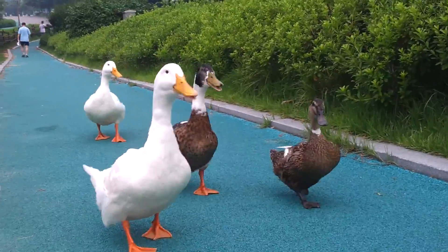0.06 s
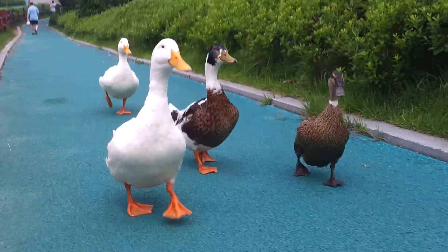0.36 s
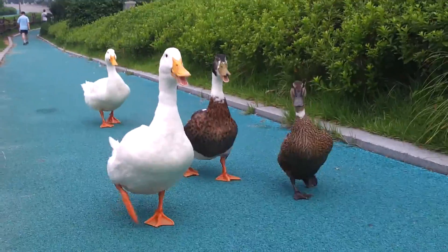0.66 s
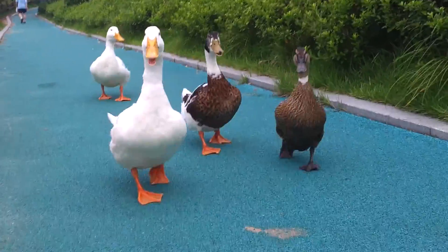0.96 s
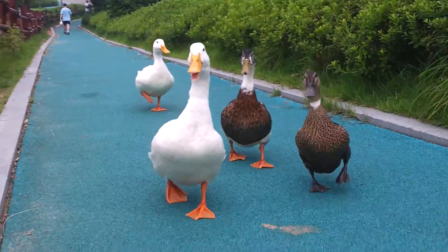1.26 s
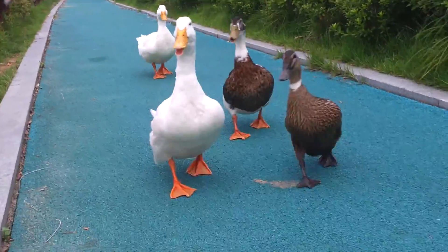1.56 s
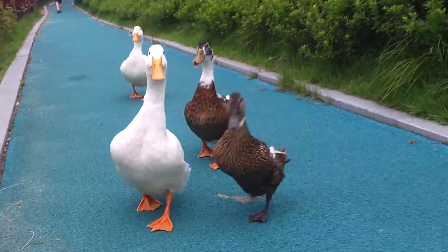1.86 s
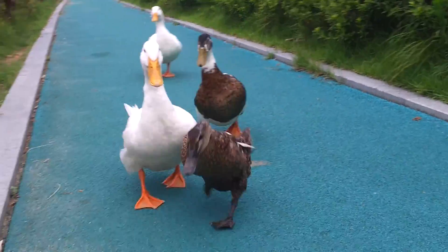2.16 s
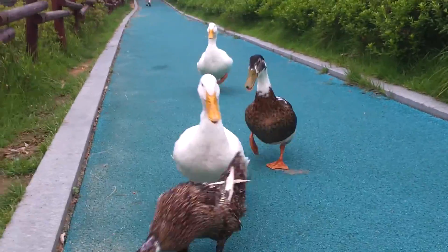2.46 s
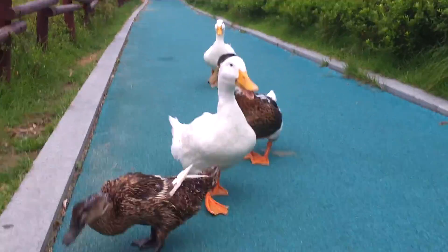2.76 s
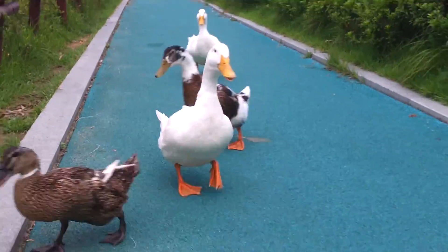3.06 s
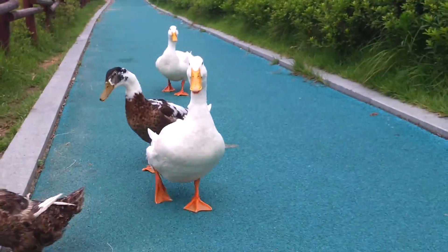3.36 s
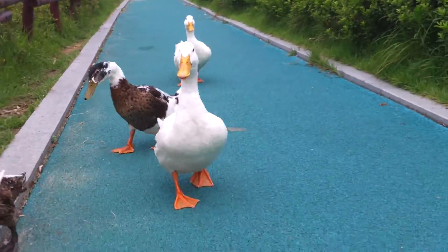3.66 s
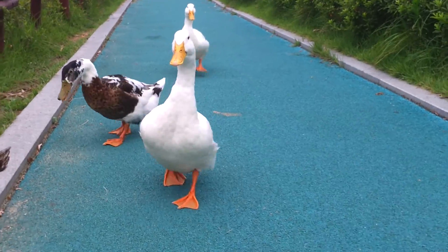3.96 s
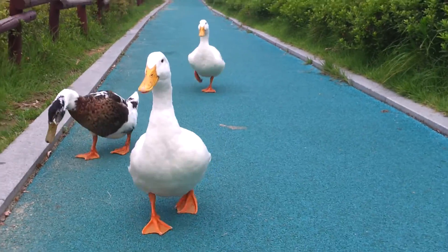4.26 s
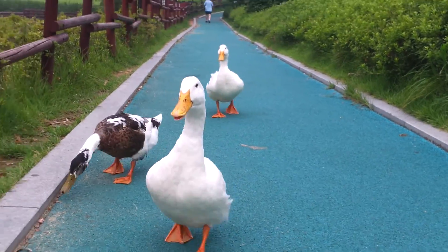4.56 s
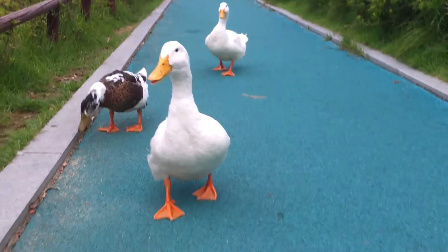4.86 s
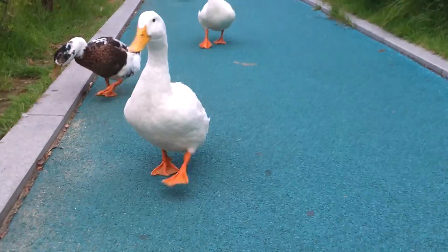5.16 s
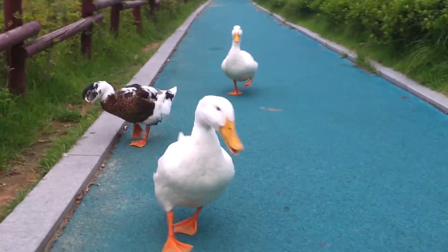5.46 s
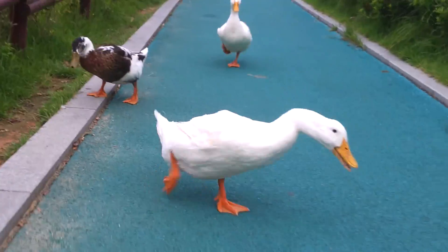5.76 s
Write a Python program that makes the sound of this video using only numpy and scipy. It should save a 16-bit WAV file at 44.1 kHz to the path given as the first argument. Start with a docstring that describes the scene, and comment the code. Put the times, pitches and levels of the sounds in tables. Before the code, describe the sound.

Short, low, raspy duck quacks follow one another outdoors over high cicada buzzing, with light ticks and scuffs of feet on grit.

```python
"""Domestic ducks waddle up a park path toward a hand-held microphone, quacking short, low and rasping.
Most calls open with a cluck of the bill, then the flapping syrinx rings the throat. Close by, feet
scuff and tick on the grit. In the bushes cicadas buzz and trill with their buckling tymbals; far off
are the town and a humming machine. Late on, the hand jostles and bumps the microphone."""
import sys
import numpy as np
from scipy import signal
from scipy.fft import rfft, irfft, next_fast_len
from scipy.io import wavfile
from scipy.ndimage import uniform_filter1d

SR = 44100
rng = np.random.default_rng(int(sys.argv[2]) if len(sys.argv) > 2 else 0)


def output_pcm(signal):
    """Save a mono or channel-first signal as 16-bit PCM at the path in sys.argv[1].

    Samples are clipped to [-1, 1] before scaling.
    """
    pcm = np.clip(np.atleast_2d(signal).T, -1, 1) * 32767
    wavfile.write(sys.argv[1], SR, np.round(pcm).astype(np.int16))


N = 260631
TIME = np.arange(N) / SR

# spectrum of the open air: frequency_hz, gain_db
AIR_SPECTRUM = [(20, -50), (35, -26), (55, 4.5), (110, 2), (200, -1), (350, -6), (650, -12), (1200, -11),
                (2900, -17.5), (4200, -15), (5200, -16), (6000, -14.5), (6500, -10.5), (7500, -16.5),
                (10500, -13), (12000, -45), (14500, -45)]
# level of the open air: time_s, level_db
AIR_LEVELS = [(0, -43.5), (1.1, -44.5), (1.7, -44.5), (2.6, -45), (3.2, -45), (4.5, -45), (5.9, -43.5)]
# partials of the far machine: pitch_hz, relative_db
HUM_PARTIALS = [(70, -52.5), (140, -55)]
# cicada buzz in the bushes: time_s, level_db, body_resonance_hz, direct_chirp_gain
BUZZ_CURVES = [(0.0, -35.5, 9300, 0.54), (0.6, -35.5, 9300, 0.8), (0.89, -35, 9330, .7),
               (1.03, -30, 9330, 0.8), (1.12, -33.5, 9400, 1), (1.36, -31, 9370, 0.8),
               (1.54, -34, 9230, 0.77), (1.81, -31, 9300, 0.19), (2.5, -33.5, 9370, 0.22),
               (3.22, -37, 9410, .22), (3.65, -36.5, 9370, 0.1), (4.75, -40, 9380, 0.43),
               (4.91, -44, 9320, 0.4), (5.9, -41.5, 9470, 0.16)]
# spectrum of the blurred cicada chorus: frequency_hz, gain_db
CHORUS_SPECTRUM = [(7000, -60), (7700, -43), (8400, -4), (9000, 7), (9400, -8), (9900, 1.5), (10500, -42),
                   (11400, -14.5), (12500, -59)]
# duck calls: start_s, rise_s, fade_s, relative_db, flaps_per_s, pitch_hz, climb_octaves_per_s,
# bill_gape (0-1), cluck_strength (0-1)
DUCK_CALLS = [(0.011, 0.016, 0.018, -34.5, 54, 1393, 6, 0.6, 0.25),
              (0.075, 0.083, 0.046, -27.5, 59, 1515, 0.6, 0.28, 0.6),
              (0.391, 0.059, 0.039, -29, 65, 1506, 0, 0.36, 0.56),
              (0.614, 0.04, 0.031, -26.5, 69, 1698, -2.0, 0.7, 0.71),
              (0.95, 0.051, 0.06, -30.5, 60, 1467, 5, 0.25, 0.65),
              (1.237, 0.047, 0.061, -29, 57, 1660.0, 2, 0.7, 0.42),
              (1.437, 0.026, 0.042, -26.5, 74, 1616, 1.5, 0.4, 0),
              (1.522, 0.028, 0.046, -35, 62, 1362, 7.8, 0.5, 0.35),
              (1.714, 0.025, 0.074, -27.5, 71, 1530.0, -1.4, 0.24, 0.52),
              (1.916, 0.049, 0.018, -28, 73, 1482, -3, 0.9, 0),
              (1.976, 0.038, 0.024, -25.5, 66, 1616, -9.5, 0.6, 0.73),
              (2.191, 0.038, 0.042, -26, 72, 1566, 1.4, 0.62, 0.42),
              (2.386, 0.031, 0.039, -29, 67, 1597, -2.3, 0.74, 0.02),
              (2.48, 0.027, 0.046, -28.5, 66, 1470.0, 4.9, 0.84, 0.58),
              (2.718, 0.043, 0.025, -25.5, 61, 1492, 0.5, 0.74, 0.52),
              (2.893, 0.031, 0.027, -25.5, 64, 1480.0, 6.5, 0.62, 0),
              (2.952, 0.039, 0.036, -26.5, 69, 1580, -1, 0.75, 0.25),
              (3.222, 0.044, 0.047, -28.5, 65, 1566, 4, 0.5, 0.25),
              (3.415, 0.024, 0.033, -27, 64, 1676, -6.5, 0.46, 0.07),
              (3.528, 0.04, 0.017, -28.5, 68, 1510, -9.0, 0.55, 0.4),
              (3.735, 0.025, 0.052, -26, 68, 1524, 1.5, 0.4, 0.48),
              (3.919, 0.025, 0.027, -29, 70, 1872, 1, 0.52, 0.05),
              (4.117, 0.041, 0.018, -27.5, 66, 1652, 6, 0, 0.48),
              (4.274, 0.026, 0.032, -38.5, 58, 1617, -6.5, 0.8, 0.2),
              (4.429, 0.029, 0.034, -26.5, 74, 1536, -9.5, 0.4, 0.54),
              (4.744, 0.026, 0.036, -29, 69, 1636, -9.0, 0.3, 0.55),
              (5.013, 0.028, 0.04, -27, 62, 1690, -7, 0.4, 0.58),
              (5.213, 0.028, 0.042, -25, 74, 1700, -1.5, 0.43, 0.46),
              (5.453, 0.023, 0.034, -24.5, 78, 1807, -8, 0.5, 0.62),
              (5.72, 0.025, 0.027, -26.5, 66, 1640, 0, 0.65, 0.37)]
# puff of the opening bill: frequency_hz, gain_db
CLUCK_SPECTRUM = [(150, 1.5), (600, -2.5), (900, 15), (1200, 5), (1550, 3), (2100, -1), (2700, 1.5),
                  (3500, 5.5), (4200, 2), (5000, 2.5), (6200, 1.5), (8000, -6.5), (12000, -60)]
# throat resonances: centre_hz, width_hz, bill_shut_db, bill_open_db
THROAT_MODES = [(890, 150, -6, 7), (1237, 74, 7.5, 11), (1534, 89, -5, 3.5), (1888, 78, 6, 3.5),
                (2410, 190, -9, 14.5)]
# upper resonances of windpipe and bill: centre_hz, width_hz, bill_shut_db, bill_open_db
WINDPIPE_MODES = [(3024, 260, -4, -1.5), (3650, 74, -3.5, 6.5), (4250, 330, 1, -7), (4770, 59, 5.5, 10),
                  (5190, 155, 6.5, 0.5), (6200, 730, -2.5, -8.5)]
# bouts from a second kind of cicada: start_s, length_s, pitch_hz, level_db, change_db_per_s
TRILL_BOUTS = [(0.027, .06, 5230, -27.5, 0), (0.109, .41, 5310, -38, -18), (0.564, .29, 3860, -48, -5),
               (0.867, .6, 5056, -37.5, -3), (1.045, .18, 4430, -51, 0), (1.577, .6, 5056, -47.5, -5),
               (3.363, .5, 5100, -47, -8)]
# feet dragging on the path: middle_s, length_s, level_db
FOOT_SCUFFS = [(0.265, 0.15, -43.5), (1.271, 0.084, -36), (1.564, 0.086, -38.5), (1.972, 0.063, -41),
               (2.178, 0.14, -41.5), (2.856, 0.15, -41.5), (3.577, 0.076, -39), (4.026, 0.1, -46),
               (5.589, 0.15, -40), (5.834, 0.14, -35.5)]
# grit under a sole: frequency_hz, gain_db
SCUFF_SPECTRUM = [(100, -14.5), (250, 5), (600, 0), (1000, 4.5), (1500, 0), (3000, 0), (5000, 0),
                  (8000, -3), (11000, -12), (14500, -49)]
# claws and grit striking the path: start_s, peak_db, tilt_db_per_octave, crunch_decay_s
GRIT_TICKS = [(0.319, -17.5, 3.5, 0.0008), (0.9761, -22.5, -9.5, 0.0018), (1.277, -16, -4, 0.0014),
              (1.8526, -17, 2.5, 0.0037), (2.1896, -22, -2, 0.0014), (2.845, -22, 2, .003),
              (2.8745, -20, -1, .001), (2.878, -19.5, 2, .002), (4.0261, -21.5, -3.5, 0.0026),
              (4.033, -23.5, -1, .002), (4.246, -9.5, 6, 0.0014), (4.9867, -15, 1.5, 0.00057),
              (5.5589, -12.5, 1, 0.0012), (5.5722, -22, -2, 0.00083), (5.5886, -19, -5, 0.00087),
              (5.5975, -15, -3, 0.0027), (5.6166, -12, -2, 0.003), (5.634, -19, -3, 0.0011),
              (5.849, -14, -2, 0.0017)]
# spectrum of one tick: frequency_hz, gain_db
TICK_SPECTRUM = [(150, -1), (800, 6.5), (1500, 6.5), (2800, 10), (4700, 9.5), (7000, 4.5), (9500, -0.5),
                 (11500, -10), (14500, -18.5)]
# dull bumps on the microphone: middle_s, length_s, pitch_hz, level_db
MIC_BUMPS = [(4.623, .12, 60, -43), (4.836, 0.041, 59, -37), (5.683, 0.0366, 104, -32)]


def gain_of(db):
    """Decibels to a factor."""
    return 10 ** (np.asarray(db) / 20)


def unit_rms(x):
    """Scales to an rms of 1."""
    return x / np.sqrt(np.mean(x ** 2) + 1e-20)


def add(mix, start_s, sound):
    """Mixes a sound in at a time."""
    at = round(start_s * SR)
    sound = sound[max(-at, 0):]
    part = mix[max(at, 0):][:len(sound)]
    part += sound[:len(part)]


def colour(x, spectrum, tilt_db=0):
    """Causal filter with the given spectrum, tilted by tilt_db an octave about the mid treble."""
    size = next_fast_len(len(x) + 2048)
    octave = np.log2(abs(np.fft.fftfreq(size, 1 / SR)) + 1)
    hz, db = np.transpose(spectrum)
    curve_db = np.interp(octave, np.log2(hz), db) + tilt_db * np.clip(octave - 12, -1.5, 1)
    minimum_phase = np.exp(np.conj(signal.hilbert(np.log(gain_of(curve_db)))))
    return np.fft.ifft(np.fft.fft(x, size) * minimum_phase).real[:len(x)]


def band(x, low_hz, high_hz):
    """Band-pass filter."""
    return signal.sosfilt(signal.butter(3, [low_hz, high_hz], 'bandpass', fs=SR, output='sos'), x)


def drift(per_s):
    """Smooth random wandering of rms 1 over the whole scene."""
    hz = np.fft.rfftfreq(N, 1 / SR)
    return unit_rms(irfft(rfft(rng.standard_normal(N)) * np.exp(-(hz / per_s) ** 2), N))


def resonate(x, hz, width_hz):
    """A resonance of gain 1, steady or following a curve."""
    carrier = np.exp(2j * np.pi * np.cumsum(hz * np.ones(len(x))) / SR)
    pole = np.exp(-np.pi * width_hz / SR)
    return 2 * (carrier * signal.lfilter([1 - pole], [1, -pole], x / carrier)).real


def hedge_scatter(x, t60_s=0.056, wet_db=-17):
    """Hedge and fence scatter a short tail back to the microphone."""
    t = np.arange(SR // 2) / SR
    echoes = rng.standard_normal(len(t)) * (rng.random(len(t)) < .05)
    echoes *= (t > .006) * gain_of(-60 * t / t60_s)
    return x + gain_of(wet_db) * signal.fftconvolve(x, echoes / np.linalg.norm(echoes))[:N]


def open_air(swell_db=1.0):
    """Distant town and insects merge into a nearly steady wash."""
    level_db = np.interp(TIME, *np.transpose(AIR_LEVELS)) + swell_db * drift(1.8)
    return gain_of(level_db) * unit_rms(colour(rng.standard_normal(N), AIR_SPECTRUM))


def machine_hum(trim_db=-1):
    """A machine far off, wavering in pitch and level."""
    wavering_s = np.cumsum(1 + .008 * drift(5)) / SR
    return sum(np.sqrt(2) * gain_of(db + trim_db + 2 * drift(5)) * np.sin(2 * np.pi * hz * wavering_s)
               for hz, db in HUM_PARTIALS)


def tymbal(buckles_per_s, top_hz, fall_hz):
    """Each buckling of a cicada's tymbal rings a short note that falls in pitch."""
    phase = np.cumsum(buckles_per_s * (1 + .039 * drift(60))) / SR % 1
    hz = top_hz - fall_hz * phase + 110 * drift(202)
    attack = 1 - np.exp(-(phase / .05) ** 2)
    decay = np.exp(-phase / .98) * (1 - phase ** 6)
    return unit_rms(attack * decay * np.sin(2 * np.pi * np.cumsum(hz) / SR) * gain_of(.26 * drift(59)))


def cicada_buzz(body_width_hz=230):
    """Two near cicadas ring their hollow bodies; as the path leads away they sink into the chorus."""
    times, *columns = np.transpose(BUZZ_CURVES)
    level_db, body_hz, direct = (np.interp(TIME, times, column) for column in columns)
    pair = tymbal(127, 10250, 2700) + gain_of(-7) * tymbal(121.5, 10200, 2400)
    pair = hedge_scatter(resonate(pair, body_hz, body_width_hz) + direct * pair, t60_s=.04, wet_db=-8)
    pair /= np.sqrt(uniform_filter1d(pair ** 2, size=6000))  # the level curve alone sets the loudness
    chorus = unit_rms(colour(rng.standard_normal(N), CHORUS_SPECTRUM))
    chorus_gain = gain_of(np.interp(TIME, [3, 5], [-13, -5]))
    return gain_of(level_db) * (pair + chorus_gain * chorus) / np.hypot(1, chorus_gain)


def bill_clucks(full_db=-17.5, knock_hz=900, knock_db=-16):
    """The bill parts at the start of a call: a soft puff and a small knock."""
    out, t = np.zeros(N), np.arange(2200) / SR
    onset = np.minimum(t / .0008, 1)
    decay = np.exp(-t / .004) + gain_of(-13) * np.exp(-t / .02)
    for start, *_, strength in DUCK_CALLS:
        puff = colour(rng.standard_normal(len(t)) * onset * decay, CLUCK_SPECTRUM)
        knock = np.sin(2 * np.pi * knock_hz * rng.uniform(.9, 1.05) * t) * onset * np.exp(-t / .005)
        add(out, start, strength * gain_of(full_db) * (puff / abs(puff).max() + gain_of(knock_db) * knock))
    return out


def vocal_tract(x, modes, gape, tuning):
    """Parallel resonances of alternating sign, weighted by the bill's gape and tuned by the neck."""
    return sum((-1) ** k * gain_of(shut_db + gape * (open_db - shut_db)) * resonate(x, hz * tuning, width)
               for k, (hz, width, shut_db, open_db) in enumerate(modes))


def quack(swell_s, fade_s, flaps_per_s, pitch_hz, climb, gape, flutter_hz=330, rasp_db=-9):
    """Each flap of the syrinx lets a nasal squawk up the throat. Returns (time to peak effort, call)."""
    breath, leak, open_cycles = .16, .2, .15
    t = np.arange(-1.8 * swell_s, 1.6 * fade_s, 1 / SR)
    effort = np.exp(-abs(t / np.where(t < 0, swell_s, fade_s)) ** 2.7)
    reach_octaves = .33 if climb > 0 else .16
    contour_hz = pitch_hz * 2 ** (reach_octaves * np.tanh(climb * t / reach_octaves))
    # the throat follows the pitch and arches with the effort
    tuning = (contour_hz / 1550) ** .18 * (1 + .03 * (effort - .8)) * rng.normal(1, .008)
    jitter = .036 * np.sin(2 * np.pi * (t * flaps_per_s / np.pi + rng.random()))
    cycles = t * flaps_per_s + jitter
    flap = np.round(cycles).astype(int)
    phase = cycles - flap
    spreads = np.array([[.06], [.8], [.13], [.2]])  # no two flaps are alike
    detune, slide, force, flutter_speed = 1 + spreads * rng.standard_normal((4, 32))[:, flap]
    opening = force * np.exp(-.5 * (phase / (open_cycles * np.where(phase < 0, .65, 1.25))) ** 2)
    angle = 2 * np.pi * np.cumsum(contour_hz * detune * 2 ** (.55 * slide * phase)) / SR
    # a faster flutter of the membrane spreads each squawk over the neighbouring resonances
    flutter = 1 + .4 * np.cos(2 * np.pi * (np.cumsum(flutter_hz * flutter_speed) / SR + rng.random()))
    squawk = (np.sin(angle) + .17 * opening * np.sin(2 * angle)) * flutter
    air, hiss = rng.standard_normal((2, len(t)))
    flow = (opening + leak) * ((1 - breath) * squawk + 4 * breath * air)
    voice = band(vocal_tract(flow, THROAT_MODES, gape, tuning), 630, 3500)
    # effort alone sets how loud a flap is, whichever resonance it meets
    period = round(SR / flaps_per_s)
    power = uniform_filter1d(uniform_filter1d(voice ** 2, period), period)
    voice = effort * voice / np.sqrt(power + 1e-12)
    # the upper resonances are struck as the opening snaps shut
    closing = force * np.exp(-.5 * ((phase - .1) / open_cycles) ** 2)
    snaps = hiss * effort ** 1.43 * (closing + leak)
    rasp = band(vocal_tract(snaps, WINDPIPE_MODES, gape, tuning), 1900, 6640)
    call = unit_rms(voice) + gain_of(rasp_db) * unit_rms(rasp)
    return -t[0], call * np.sqrt(np.mean((effort * opening) ** 2))


def ducks(trim_db=0.5, catch_s=.009, lead_s=0.001494):
    """Voices catch just after the bills open; the strongest flap leads the throat's loudest ring."""
    out = np.zeros(N)
    for start, rise, fade, db, flaps_per_s, hz, climb, gape, _ in DUCK_CALLS:
        to_peak_s, call = quack(max(rise - catch_s, catch_s), fade, flaps_per_s, hz, climb, gape)
        add(out, start + rise - lead_s - to_peak_s, gain_of(db + trim_db) * call)
    return out


def far_cicada(level_db=-53, throb_hz=9, throb_db=3.5):
    """A far singer comes and goes, reaching the microphone mostly as scattered sound."""
    song = unit_rms(hedge_scatter(tymbal(84, 5500, 800), t60_s=.1, wet_db=4))
    swell_db = throb_db * np.sin(2 * np.pi * throb_hz * TIME + drift(1.7)) + 2 * drift(2.2)
    return gain_of(level_db) * unit_rms(song * gain_of(swell_db))


def trill(hz, length_s=.054, chirps_per_s=83, spread_db=2.5, blur=.4):
    """A run of four or five uneven falling chirps, blurred by the leaves."""
    t = np.arange(int(length_s * SR)) / SR
    cycles = t * chirps_per_s * rng.uniform(.92, 1.08)
    phase = cycles % 1
    detune, steepness, strength = rng.standard_normal((3, 16))[:, cycles.astype(int)]
    sweep = .22 * (hz / 5000) ** 2 * (1 + steepness / 4)
    pitch_hz = hz * (1 + .018 * detune) * (1 - sweep * (phase - .5))
    pulses = gain_of(spread_db * strength) * np.sin(np.pi * phase) ** 2
    chirps = pulses * np.sin(2 * np.pi * np.cumsum(pitch_hz) / SR)
    scatter = resonate(resonate(rng.standard_normal(len(t)), hz, 900), hz, 900)
    return (unit_rms(chirps) + blur * unit_rms(scatter)) * signal.windows.tukey(len(t), .25)


def cicada_trills(every_s=.11, slowing_per_s=.08, first_trill_db=-5):
    """Bouts of trills from the bushes; each opens softly and slows as it goes on."""
    out = np.zeros(N)
    for start, length, hz, db, db_per_s in TRILL_BOUTS:
        for elapsed in np.arange(0, length, every_s):
            level_db = db + db_per_s * elapsed + first_trill_db * (elapsed == 0)
            add(out, start + elapsed * (1 + slowing_per_s * elapsed), gain_of(level_db) * trill(hz))
    return out


def foot_scuffs(grains_per_s=3500):
    """Soles drag over grit close by: many small grains under each stroke."""
    strokes = np.zeros(N)
    for middle, length, db in FOOT_SCUFFS:
        add(strokes, middle - length / 2, gain_of(db) * signal.windows.tukey(int(length * SR), .6))
    grains = (rng.random(N) < grains_per_s / SR) * rng.standard_normal(N)
    return strokes * unit_rms(colour(grains, SCUFF_SPECTRUM))


def grit_ticks():
    """Claws and grit strike the path: a sharp contact, then a very short crunch."""
    out, t = np.zeros(N), np.arange(1300) / SR
    for start, peak_db, tilt_db, decay_s in GRIT_TICKS:
        decay = np.exp(-t / decay_s) + gain_of(-24) * np.exp(-t / .008)
        crunch = .4 * rng.standard_normal(len(t)) * decay
        crunch[0] += 1  # the contact
        tick = colour(crunch, TICK_SPECTRUM, tilt_db)
        add(out, start, gain_of(peak_db) * tick / abs(tick).max())
    return out


def handling_rumble(from_s=4.53, full_s=5.8, level_db=-48.5, lumps_db=4):
    """The grip on the microphone grows restless: a lumpy low rumble."""
    rumble = unit_rms(band(rng.standard_normal(N), 48, 100) * gain_of(lumps_db * drift(10)))
    return gain_of(level_db) * np.interp(TIME, [from_s, full_s], [0, 1]) * rumble


def mic_bumps():
    """Each jolt shakes the microphone for a few slow cycles."""
    out = np.zeros(N)
    for middle, length, hz, db in MIC_BUMPS:
        t = np.arange(int(length * SR)) / SR
        shake = np.sqrt(2) * np.hanning(len(t)) * np.sin(2 * np.pi * (hz * t + rng.random()))
        add(out, middle - length / 2, gain_of(db) * shake)
    return out


def scene():
    """One microphone on the path: ducks and feet in front, cicadas in the bushes, the town behind."""
    path = hedge_scatter(ducks() + bill_clucks() + grit_ticks() + foot_scuffs())
    bushes = cicada_buzz() + cicada_trills()
    distance = open_air() + machine_hum() + far_cicada()
    return (path + bushes + distance + handling_rumble() + mic_bumps())[None]


def record(dry, edge_hz=14650):
    """The recorder's band limit."""
    low_pass = signal.firwin(511, edge_hz, window=("kaiser", 9), fs=SR)
    return signal.oaconvolve(dry, low_pass[None], "same")


dry = scene()
out = record(dry)
output_pcm(out)
```